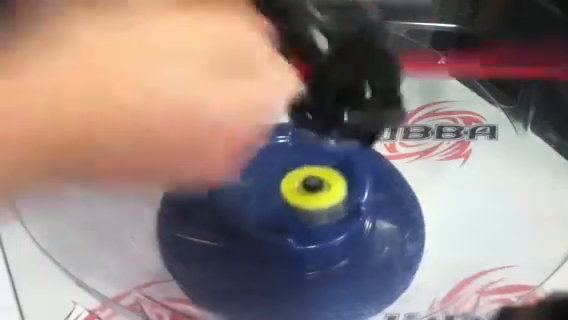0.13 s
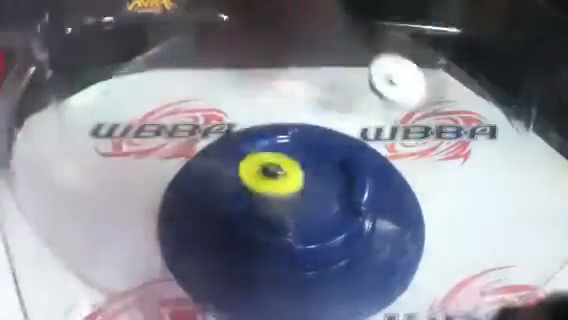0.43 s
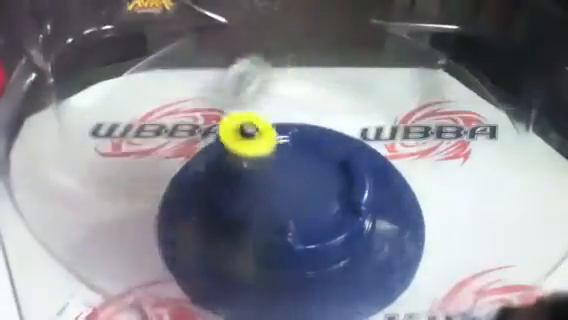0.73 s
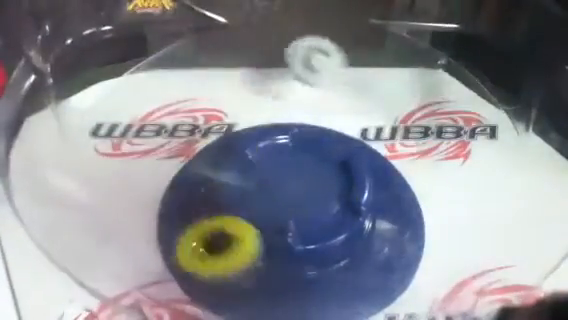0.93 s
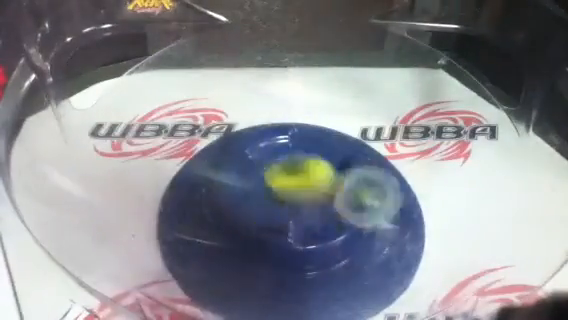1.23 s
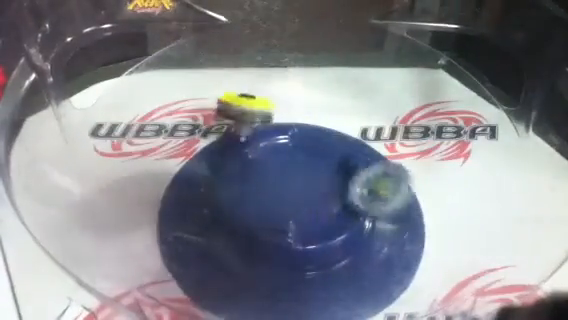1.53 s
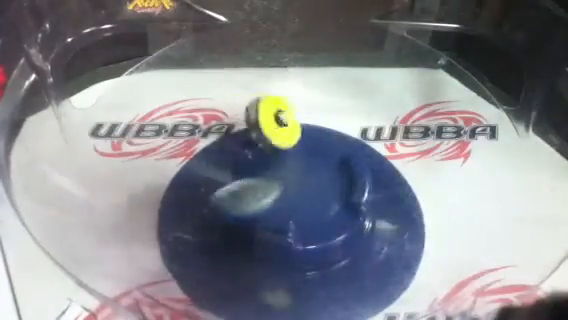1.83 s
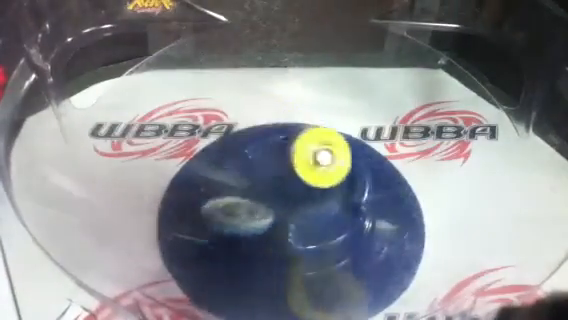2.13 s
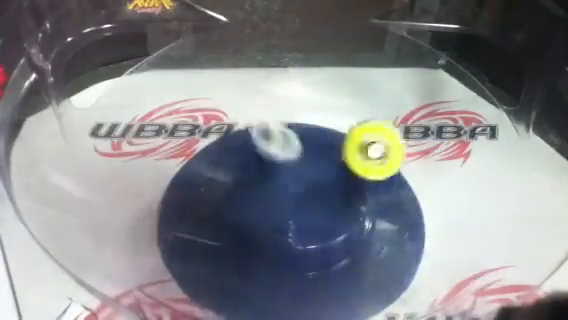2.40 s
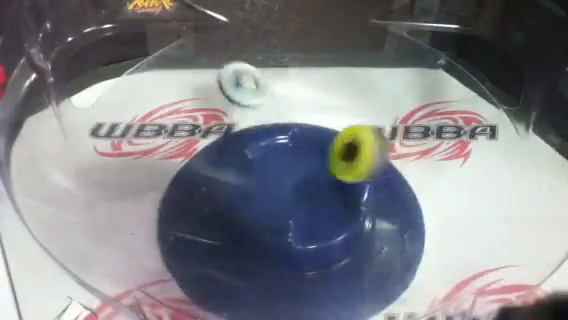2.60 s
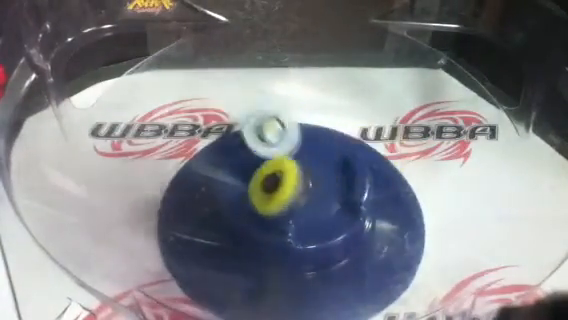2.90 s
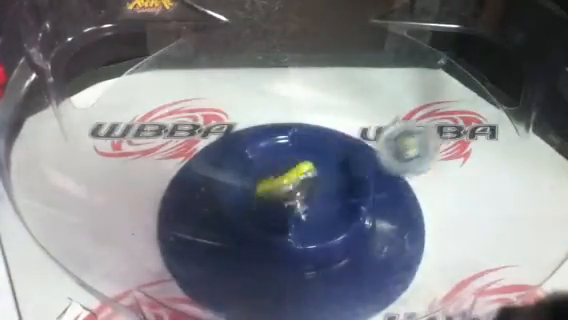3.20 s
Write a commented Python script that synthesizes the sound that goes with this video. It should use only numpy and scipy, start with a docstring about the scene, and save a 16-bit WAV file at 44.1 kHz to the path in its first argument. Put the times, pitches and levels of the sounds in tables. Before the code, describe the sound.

Battling spinning tops grind, clash sharply and rattle against a hollow plastic bowl after a ratcheting launch

```python
"""One top grinds alone in a thin plastic arena, then a toothed cord clacks and whirs through a launcher.
A second top thuds down twice; rims clash, crack and ring, a wobbling top knocks and scrapes the shell.
Sources are sines, pulses and gritty noise shaped by resonances of shell, rims and launcher.
Throughout: grinding tips, shell boom, short room tail, faint rumble and hiss; the microphone rounds peaks."""
import sys
import numpy as np
from scipy import signal
from scipy.io import wavfile
from scipy.ndimage import uniform_filter1d

SR = 44100
rng = np.random.default_rng(int(sys.argv[2]) if len(sys.argv) > 2 else 0)


def put_to_file(sound):
    """Save the sound as 16-bit audio at rate SR, in the file named by the first command-line argument."""
    columns = np.atleast_2d(sound).T  # one column per channel
    safe = np.clip(columns, -1, 1)
    whole_steps = np.round(safe * 32767)
    wavfile.write(sys.argv[1], SR, whole_steps.astype(np.int16))


N = 147735
TIME_S = np.arange(N) / SR


def undb(db):
    """Decibels to amplitude."""
    return 10 ** (np.asarray(db) / 20)


def unit(x):
    """Scale to RMS 1."""
    return x / np.sqrt(np.mean(x ** 2))


def filtered(x, order, hz, kind="low"):
    """Butterworth low- or high-pass."""
    return signal.sosfilt(signal.butter(order, hz, kind, fs=SR, output="sos"), x)


def ring(x, hz, width_hz):
    """One resonance, gain 1 at its centre."""
    return signal.lfilter(*signal.iirpeak(hz, hz / width_hz, fs=SR), x)


def body(x, modes):
    """Sum of resonances of alternating sign, scaled so that white noise keeps its level."""
    impulse = np.eye(1, 8192)[0]
    response = 0
    for k, (hz, width_hz, db) in enumerate(modes):
        response = response + (-1) ** k * undb(db) * ring(impulse, hz, width_hz)
    return signal.fftconvolve(x, response / np.sqrt(np.sum(response ** 2)))[:N]


def burst(start_s, hold_s, release_s):
    """Envelope: 0.49 ms attack, hold counted from the start, exponential release."""
    out, first = np.zeros(N), int(start_s * SR)
    hold_s, release_s = max(hold_s, 0), max(release_s, 1 / SR)
    length = int((hold_s + 10 * release_s) * SR) + 100
    t = np.arange(min(N - first, length)) / SR
    attack = np.clip(t / 0.00049, 0, 1)
    out[first:first + len(t)] = attack * np.exp(-np.clip(t - hold_s, 0, None) / release_s)
    return out


def curve(table, column):
    """Amplitude over time, interpolated in dB."""
    rows = np.array(table)
    return undb(np.interp(TIME_S, rows[:, 0], rows[:, column]))


GRIT_DB = 2.2  # mean of the exponential spread


def grit():
    """Dense contact clicks of uneven size, as noise with random gain per sample."""
    return unit(rng.standard_normal(N) * undb(GRIT_DB * rng.exponential(size=N)))


FLUTTER_RMS_DB, FLUTTER_STEP_HZ = 3, 190


def flutter():
    """Quick random wavering of the contact pressure: smoothed random steps in dB."""
    step = int(SR / FLUTTER_STEP_HZ)
    levels = np.repeat(rng.standard_normal(N // step + 1), step)
    return undb(FLUTTER_RMS_DB * unit(uniform_filter1d(levels, step)[:N]))


# clashes of the two rims: start_s, level_db, ring_hz, ring_db, ring_t60_s, crack_s, rattle_db, treble_db
CLASHES = [(0.8599, -0.5, 4420, -20.5, 0.34, 0.0042, -21, -3),
           (1.3061, -5, 4260, -15, 0.22, 0.0085, -12.5, -3),
           (1.8138, 0, 3150, -23.5, 0.14, 0.0024, -19.5, -9),
           (2.4106, -1, 4160, -12, 0.076, 0.0017, -28, -6), (2.4185, -2, 4130, -18, 0.081, 0.0026, -25, -9)]
# rims touching again just after a clash: start_s, level_db
BOUNCES = [(0.869, -38), (1.318, -5), (1.3267, -15), (1.8166, -9), (1.821, -3)]
# resonances of the tops' metal and hard plastic: mode_hz, width_hz, level_db
RIM_MODES = [(1620, 830, -2.5), (2430, 720, 3.5), (3030, 637, 7.5), (3754, 977, 9.5), (4264, 557, 10.5),
             (4765, 826, 10), (5387, 2420, 7), (6356, 1480, 3.5), (7250, 1080, -9.5), (8635, 455, -6.5)]
# resonances of the arena shell: mode_hz, width_hz, level_db
SHELL_MODES = [(135.5, 10.7, 3), (258, 100, -8.5), (390.6, 22.5, -3), (505.7, 31.7, -1), (619, 109, -1.5),
               (710, 223, -4.5), (946, 88, -3.5), (1573, 860, -6.5), (2170, 2180, -12)]
CRACK_DB, THUMP_DB, RATTLE_T60_S = -6, -25, 0.34
METAL_LOW_HZ, TREBLE_LOW_HZ = 2360, 5150
RING_WIDTH_HZ, HIGH_RING_HZ, HIGH_RING_DB = 340, 8495, -5


def rim_clashes(noise):
    """Rim impacts: a short crack with shell thump, a decaying ring and a rattle; bounces only crack."""
    noise = unit(noise)
    metal = filtered(body(noise, RIM_MODES), 1, METAL_LOW_HZ, "high")
    treble = unit(filtered(grit() * flutter(), 2, TREBLE_LOW_HZ, "high"))
    treble = treble + undb(HIGH_RING_DB) * unit(ring(noise, HIGH_RING_HZ, RING_WIDTH_HZ))
    thump = undb(THUMP_DB) * body(noise, SHELL_MODES)
    out = np.zeros(N)
    for start_s, db, hz, ring_db, ring_t60_s, crack_s, rattle_db, treble_db in CLASHES:
        tone = unit(ring(ring(noise, hz, RING_WIDTH_HZ), hz, RING_WIDTH_HZ))
        clatter = metal + undb(treble_db) * treble
        impact = undb(CRACK_DB) * (clatter + tone / 2) / 2 + thump
        crack = burst(start_s, crack_s, 0.0021) * impact
        ringing = undb(ring_db) * burst(start_s, 0, ring_t60_s / np.log(1000)) * tone
        rattle = undb(rattle_db) * burst(start_s, 0, RATTLE_T60_S / np.log(1000)) * clatter
        out += undb(db) * (crack + ringing + rattle)
    for start_s, db in BOUNCES:
        out += undb(db + CRACK_DB) * burst(start_s, 0.00093, 0.0017) * (metal + treble / 2)
    return out


# scrapes of a rim along the shell: start_s, level_db, colour_hz, hold_s
SCRAPES = [(1.4285, -18, 3630, 0.011), (1.491, -31, 1800, 0.0051), (1.514, -20, 3030, 0.0053),
           (1.549, -16, 3140, 0.006), (1.5934, -6.5, 3080, 0.0034), (1.64, -12, 1600, 0.0078),
           (1.6484, -13, 1570, 0.0081), (1.679, -21, 3090, 0.0057), (1.7164, -11.5, 1660, 0.011),
           (1.725, -9.5, 3080, 0.007), (1.7694, -23, 3000, 0.0058), (1.965, -22, 1740, 0.0063),
           (2.097, -16, 3560, 0.005), (2.1166, -17, 3440, 0.007), (2.131, -18, 2970, 0.007),
           (2.2, -10.5, 2780, 0.0062), (2.2423, -5.5, 3280, 0.011), (2.2892, -18, 3300, 0.0059),
           (2.304, -20, 4460, 0.0058), (2.354, -18, 5000, 0.0059), (2.3808, -10.5, 4600, 0.0088),
           (2.4576, -11.5, 4460, 0.013), (2.5228, -13.5, 1590, 0.01), (2.601, -14.5, 1730, 0.0044),
           (2.661, -27, 1650, 0.0039), (2.705, -19, 4720, 0.0044), (2.8374, -11.5, 1650, 0.0095),
           (2.864, -15.5, 3630, 0.007), (2.938, -14.5, 3810, 0.0057), (2.9796, -15, 1550, 0.007),
           (3.014, -16, 4030, 0.0079), (3.043, -19.5, 2780, 0.0061), (3.071, -14.5, 2930, 0.0098),
           (3.1413, -23.5, 4110, 0.0076), (3.2074, -19, 1920, 0.005)]
SCRAPE_RELEASE_S, SCRAPE_DB = 0.008, -18
TICK_DB, TICK_S = 7, 0.0005  # tick_s: hold and release
COLOUR_DB, COLOUR_WIDTH_HZ = 1, 130
RIM_LINE_HZ, RIM_LINE_WIDTH_HZ, RIM_LINE_DB = 3090, 60, 17


def scrapes(noise):
    """Rim rubs shell: ticked noise bursts drive the rim modes, one fixed line and a colour per scrape."""
    push, coloured = np.zeros(N), np.zeros(N)
    for start_s, db, hz, hold_s in SCRAPES:
        tick = undb(TICK_DB) * burst(start_s, TICK_S, TICK_S)
        shape = undb(db + SCRAPE_DB) * (burst(start_s, hold_s, SCRAPE_RELEASE_S) + tick)
        push += shape
        coloured += undb(COLOUR_DB) * shape * unit(ring(noise, hz, COLOUR_WIDTH_HZ))
    line = undb(RIM_LINE_DB) * ring(noise * push, RIM_LINE_HZ, RIM_LINE_WIDTH_HZ)
    return coloured + body(noise * push, RIM_MODES) + line


# knocks of a wobbling top on the shell: start_s, level_db, pitch_hz, hold_s
KNOCKS = [(0.93, -20.5, 588, 0.016), (1.045, -38, 623, 0.009), (1.069, -23.5, 509, 0.012),
          (1.104, -23.5, 493, 0.012), (1.426, -19, 966, 0.022), (1.495, -17.5, 483, 0.015),
          (1.533, -19.5, 517, 0.0088), (1.55, -16, 590, 0.0057), (1.592, -15, 476, 0.016),
          (1.64, -26, 590, 0.0068), (1.647, -12, 493, 0.012), (1.713, -15.5, 662, 0.016),
          (1.761, -19, 588, 0.014), (1.873, -24.5, 937, 0.016), (1.923, -26.5, 520, 0.017),
          (1.967, -20, 540, 0.0049), (2.023, -17.5, 490, 0.0083), (2.063, -20.5, 502, 0.012),
          (2.116, -17.5, 683, 0.013), (2.18, -26, 405, 0.0097), (2.198, -21.5, 924, 0.01),
          (2.241, -21.5, 408, 0.015), (2.297, -13.5, 510, 0.012), (2.352, -13.5, 630, 0.0078),
          (2.409, -21, 620, 0.014), (2.453, -23, 960, 0.012), (2.473, -16, 516, 0.0061),
          (2.558, -19.5, 500, 0.014), (2.66, -21, 496, 0.01), (2.702, -18.5, 517, 0.013),
          (2.752, -19, 492, 0.012), (2.837, -21.5, 437, 0.015), (2.918, -25.5, 967, 0.01),
          (2.942, -17.5, 930, 0.014), (2.983, -19, 945, 0.016), (3.051, -21, 512, 0.012),
          (3.077, -16, 480, 0.0097), (3.141, -18.5, 517, 0.016), (3.204, -22, 494, 0.02)]
KNOCK_DB, KNOCK_RELEASE_S = -1.5, 0.0059
PITCH_DB, PITCH_WIDTH_HZ = -4, 120
STRIKE_DB, STRIKE_RELEASE_S = -4, 0.009


def knocks():
    """Wobbling top hits the shell: a burst of shell noise and pitched noise plus a decaying sine."""
    noise = grit()
    shaken = body(noise, SHELL_MODES)
    out = np.zeros(N)
    for start_s, db, hz, hold_s in KNOCKS:
        pitched = undb(PITCH_DB) * unit(ring(noise, hz, PITCH_WIDTH_HZ))
        out += undb(db + KNOCK_DB) * burst(start_s, hold_s, KNOCK_RELEASE_S) * (shaken / 2 + pitched) / 2
        sine = np.sin(2 * np.pi * hz * (TIME_S - start_s))
        out += undb(db + STRIKE_DB) * burst(start_s, 0, STRIKE_RELEASE_S) * sine
    return out


# resonances of the launcher body: mode_hz, width_hz, level_db
LAUNCHER_MODES = [(1040, 136, -10), (1488, 63, -2.5), (1790, 113, -3), (2560, 570, -8.5), (3630, 386, 3.5),
                  (4430, 540, -0.5), (5330, 330, -4), (6200, 1250, -10), (9600, 2100, -15)]
# whir of the pulled cord: time_s, level_db
PULL = [(.226, -52), (.229, -27.5), (.25, -31.5), (.27, -26.5), (.33, -19), (.405, -14.5), (.425, -24),
        (.46, -25.5), (.52, -37)]
# teeth of the cord that clack loudest: start_s, level_db
TEETH = [(0.231, -6), (.255, 9), (0.265, -16), (0.277, 8), (0.287, -5), (.304, -2), (0.316, 1.5),
         (0.328, 1.5), (0.337, -2), (0.356, -6), (0.364, -6), (0.377, -16), (0.393, -9), (0.406, -1.5),
         (0.419, 2.5)]
TOOTH_HOLD_S, TOOTH_RELEASE_S, TOOTH_DB = 0.0014, 0.0027, -13.5
GEAR_START_S, GEAR_HOLD_S, GEAR_RELEASE_S, GEAR_DB = 0.402, 0.024, 0.0014, -33
GEAR_START_HZ, GEAR_RISE_HZ_PER_S = 1100, 3000


def launcher():
    """Tooth clacks and whir excite the launcher body; the gear sings a rising sine as the cord runs out."""
    clacks = sum(undb(db + TOOTH_DB) * burst(s, TOOTH_HOLD_S, TOOTH_RELEASE_S) for s, db in TEETH)
    pulling = (TIME_S > PULL[0][0]) * (TIME_S < PULL[-1][0])
    whir = curve(PULL, 1) * flutter() * pulling
    gear_hz = GEAR_START_HZ + GEAR_RISE_HZ_PER_S * np.clip(TIME_S - GEAR_START_S, 0, 1)
    phase = 2 * np.pi * np.cumsum(gear_hz) / SR
    gear_level = undb(GEAR_DB) * burst(GEAR_START_S, GEAR_HOLD_S, GEAR_RELEASE_S) * flutter()
    return body(grit() * (clacks + whir), LAUNCHER_MODES) + gear_level * np.sin(phase)


# blunt thuds on the shell, first the hand's jolt, then two landings: start_s, level_db, push_s
THUDS = [(.247, -17, 0.0037), (0.454, -20.5, 0.0015), (0.563, -24, 0.0024)]
THUD_DB, RATTLE_DB, RATTLE_RELEASE_S = 7, 0, 0.035


def thuds():
    """One-sided pressure pulses, direct and through the shell; the landings leave it rattling."""
    push = np.zeros(N)
    for start_s, db, push_s in THUDS:
        push -= undb(db) * np.sin(np.pi * np.clip((TIME_S - start_s) / push_s, 0, 1)) ** 2
    rattle = sum(undb(db + RATTLE_DB) * burst(s, 0, RATTLE_RELEASE_S) for s, db, _ in THUDS[1:])
    return undb(THUD_DB) * (push + body(push, SHELL_MODES) / 10) + rattle * body(grit(), SHELL_MODES)


TIP_DIP_HZ, TIP_DIP_WIDTH_HZ = 2550, 700


def rolling(x):
    """Tip noise, with a spectral dip (two notches) while the first top rolls alone."""
    alone = x
    for _ in range(2):
        alone = alone - ring(alone, TIP_DIP_HZ, TIP_DIP_WIDTH_HZ)
    return np.where(TIME_S < PULL[0][0], alone, x)


# grinding tips: time_s, shell_level_db, treble_level_db
GRIND = [(0, -52, -45.5), (.22, -47, -42.5), (.43, -57, -31), (.46, -34, -34), (.7, -35, -40.5),
         (.9, -47.5, -48.5), (1.05, -36, -38), (1.38, -44, -51), (1.5, -34, -33), (1.75, -32.5, -35),
         (1.9, -35, -45.5), (2.13, -33.5, -35), (2.33, -29.5, -28), (2.55, -36, -39.5), (2.8, -36.5, -36.5),
         (2.97, -33.5, -31), (3.1, -32, -37.5), (3.26, -46, -42), (3.35, -36, -47.5)]
WHINE_HZ, WHINE_WIDTH_HZ, WHINE_DB = 3090, 70, -8


def grinding_tips(rub_noise, metal_noise):
    """Fluttering friction noise rumbles in the shell, hisses in the tops and whines at one resonance."""
    low = body(rolling(grit() * flutter()), SHELL_MODES) * curve(GRIND, 1)
    treble_level = curve(GRIND, 2)
    hiss = body(rolling(rub_noise) * treble_level, RIM_MODES)
    whine = unit(ring(metal_noise, WHINE_HZ, WHINE_WIDTH_HZ))
    return low + hiss + undb(WHINE_DB) * treble_level * whine


BOOM_HZ, BOOM_WIDTH_HZ, BOOM_DB = 141, 20, -51.5


def shell_boom():
    """Steady low resonance of the shell under fluttering noise."""
    return undb(BOOM_DB) * unit(ring(grit() * flutter(), BOOM_HZ, BOOM_WIDTH_HZ))


ROOM_T60_S, ROOM_DB, ROOM_LOWPASS_HZ = 0.22, -12, 8200


def room_tail(dry):
    """Diffuse reflections: convolution with decaying, softened noise after a 6 ms gap."""
    t = np.arange(SR // 2) / SR
    tail = filtered(rng.standard_normal(len(t)), 1, ROOM_LOWPASS_HZ)
    tail = tail * 1000. ** (-t / ROOM_T60_S) * (t > 0.006)
    return undb(ROOM_DB) * signal.fftconvolve(dry, tail / np.sqrt(np.sum(tail ** 2)))[:N]


RUMBLE_DB, RUMBLE_LOWPASS_HZ, HISS_DB = -47, 49.4, -64.5


def background():
    """Faint low-passed noise rumble and white hiss."""
    rumble = unit(filtered(rng.standard_normal(N), 2, RUMBLE_LOWPASS_HZ))
    return undb(RUMBLE_DB) * rumble + undb(HISS_DB) * rng.standard_normal(N)


def scene():
    """Sum of all sources, room tail and background, as one channel."""
    # shared noises, so that overlapping sources add in phase
    rub_noise, metal_noise = grit() * flutter(), grit() * flutter()
    sources = rim_clashes(metal_noise) + scrapes(rub_noise) + knocks() + launcher() + thuds()
    sources = sources + grinding_tips(rub_noise, metal_noise) + shell_boom()
    return (sources + room_tail(sources) + background())[None]


MIC_LOW_HZ, MIC_HIGH_HZ, CEILING, TOP_HZ = 105, 11180, 0.66, 15800


def record(dry):
    """The microphone loses bass and top treble, rounds the loudest peaks (tanh) and cuts the top."""
    x = filtered(dry, 3, MIC_LOW_HZ, "high")
    x = filtered(x, 4, MIC_HIGH_HZ)
    rounded = CEILING * np.tanh(x / CEILING)
    return signal.sosfilt(signal.ellip(10, 0.2, 80, TOP_HZ, fs=SR, output="sos"), rounded)


dry = scene()
out = record(dry)
put_to_file(out)
```